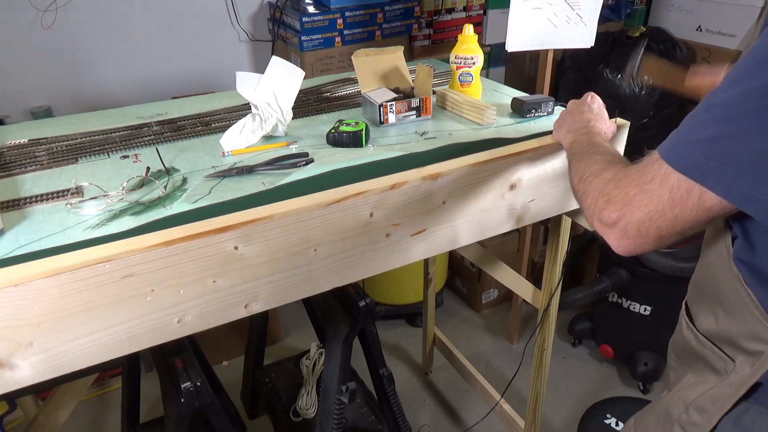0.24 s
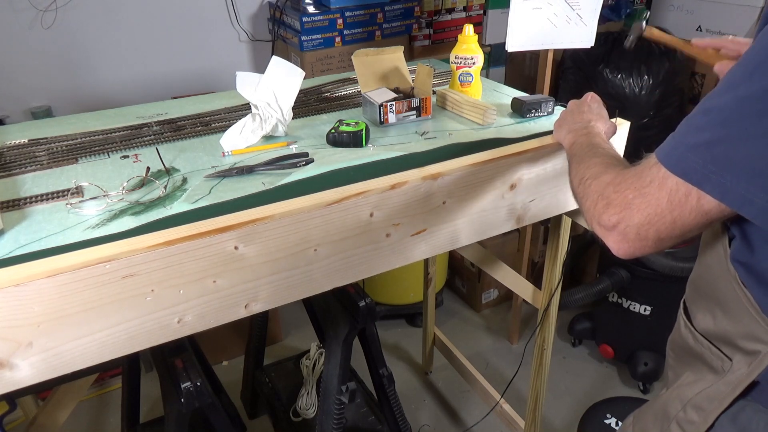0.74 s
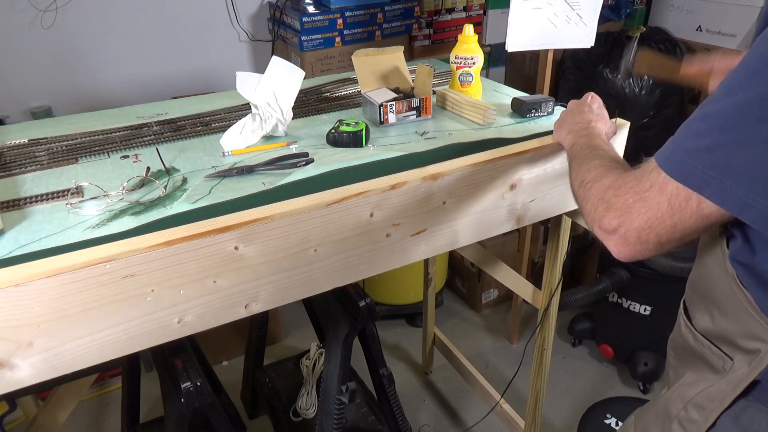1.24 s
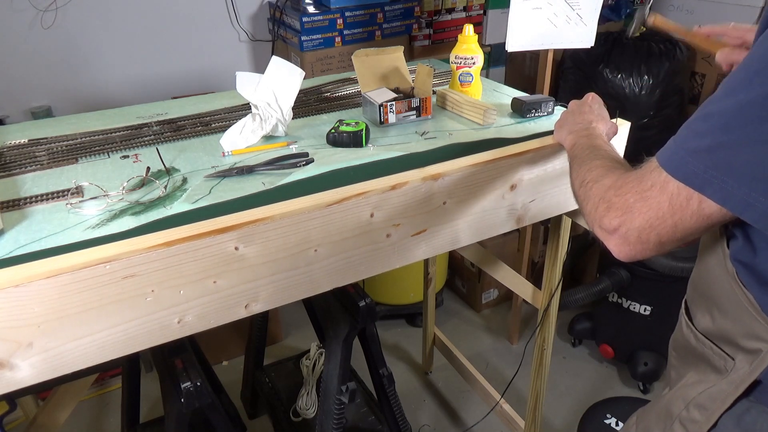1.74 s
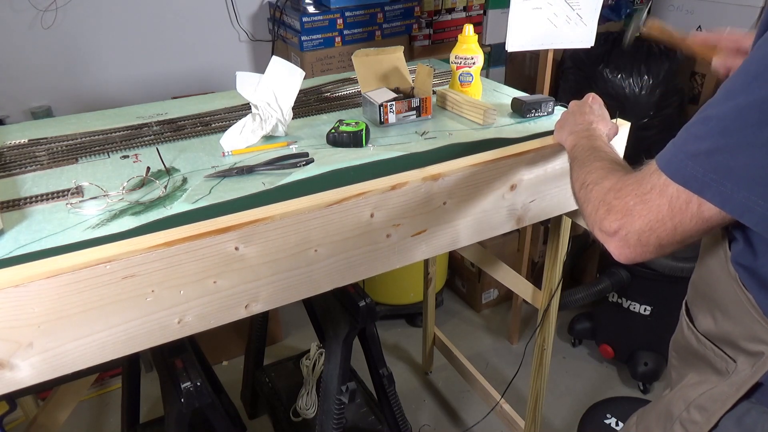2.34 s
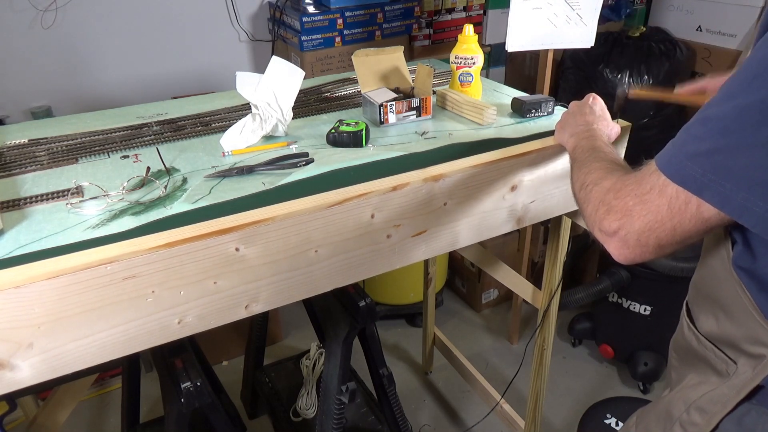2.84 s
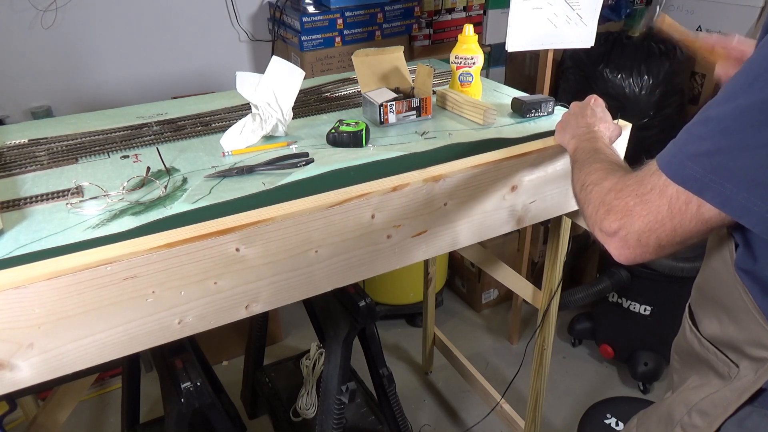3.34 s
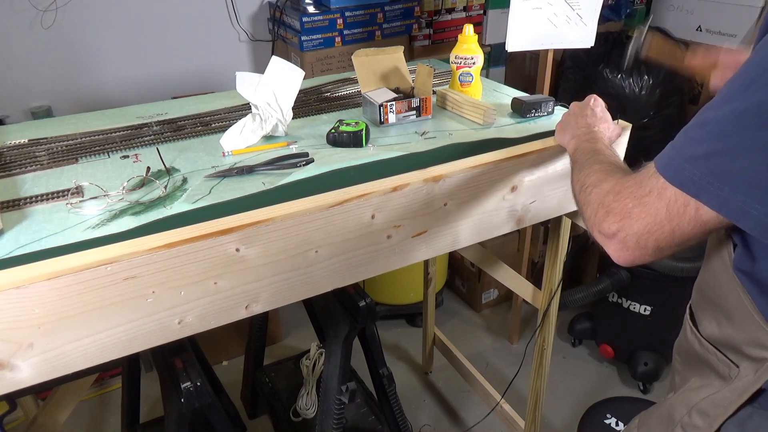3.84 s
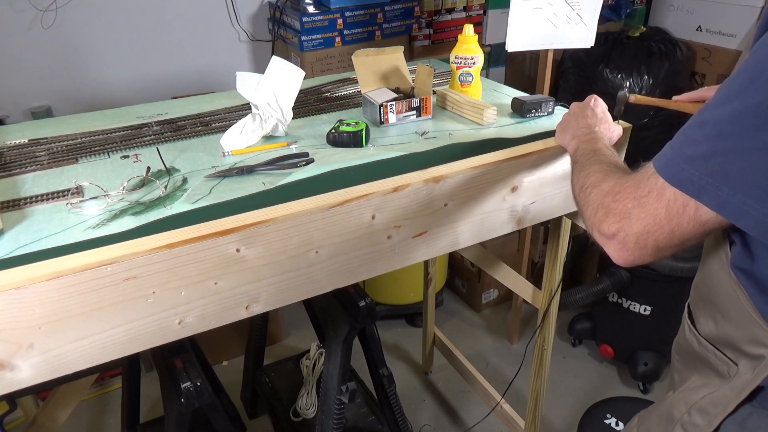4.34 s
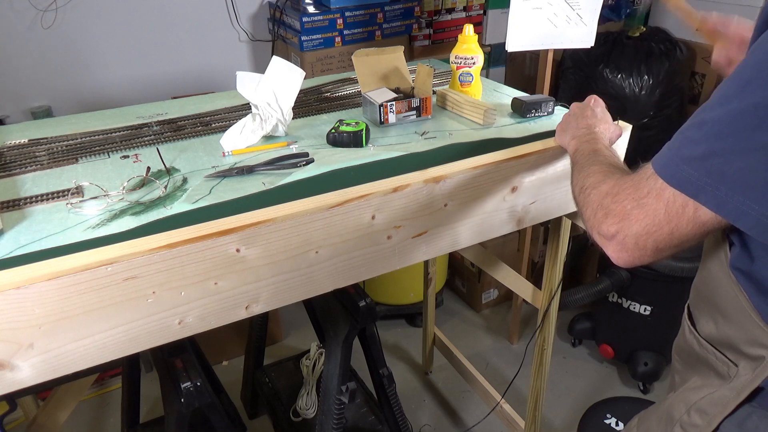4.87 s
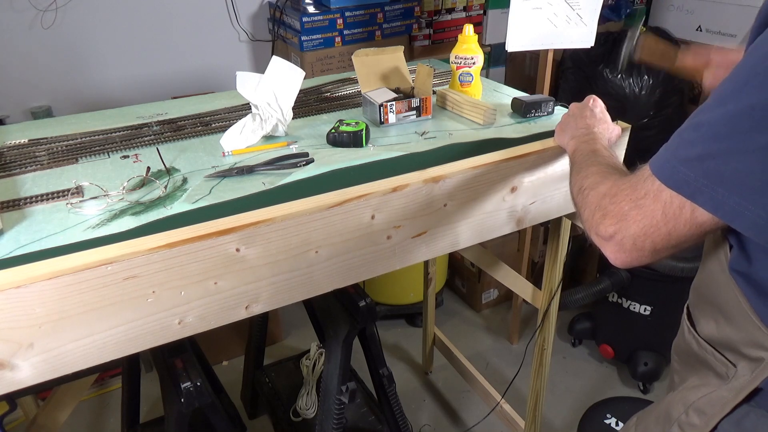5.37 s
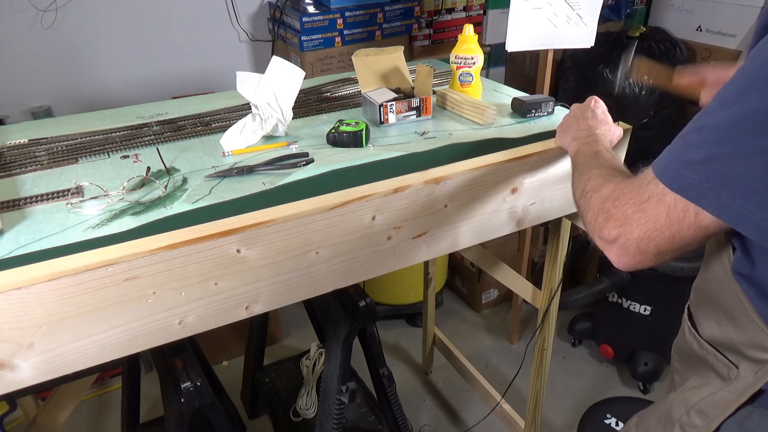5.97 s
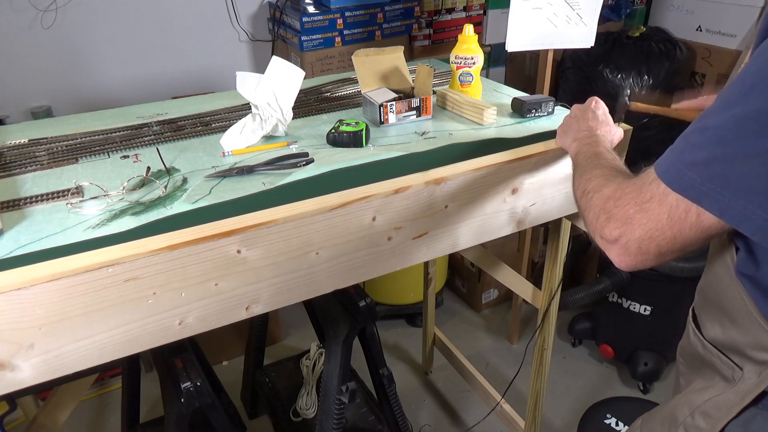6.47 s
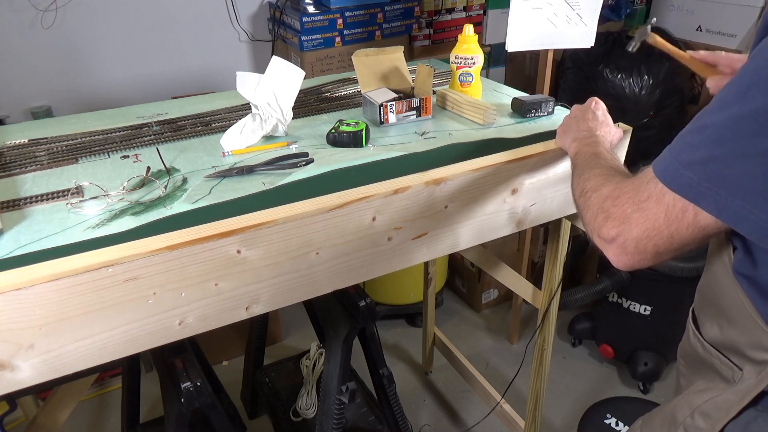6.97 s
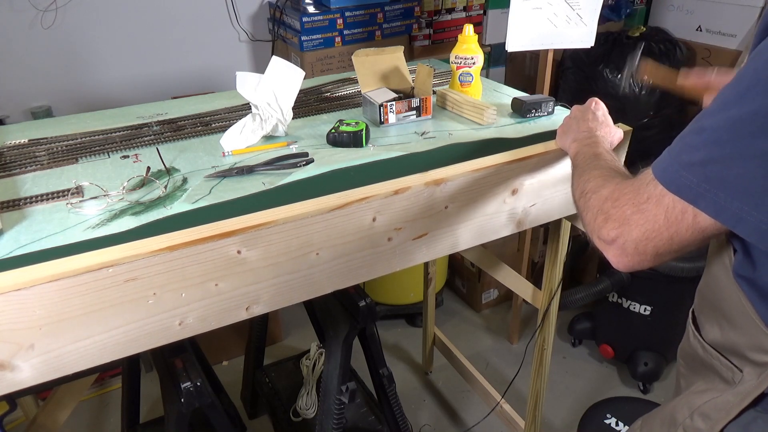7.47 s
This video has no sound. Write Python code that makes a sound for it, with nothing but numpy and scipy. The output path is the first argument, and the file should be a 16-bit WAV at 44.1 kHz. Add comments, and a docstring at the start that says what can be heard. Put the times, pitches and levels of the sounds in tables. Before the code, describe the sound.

A small hammer taps a brad through a wooden strip, about three sharp knocks a second, ringing briefly in a small workshop.

```python
"""A small hammer taps a brad through a wooden strip into a bench edge, mostly about three blows a second.
Each blow excites damped modes: a steel ping and a wooden knock, dull while the brad is loose, then harder
and higher in ring as it sinks. Three times the hammer glances off and lands on the wood. The small workshop
rings on as a dense noise tail, a limiter ducks the peaks, a few light ticks fall near the blows, and a
faint filtered-noise hiss and a hum of thin sines fade underneath."""
import sys
import numpy as np
from scipy import signal
from scipy.fft import next_fast_len
from scipy.io import wavfile
from scipy.ndimage import uniform_filter1d

SR = 44100
rng = np.random.default_rng(int(sys.argv[2]) if len(sys.argv) > 2 else 0)


def wrap_up_sound(samples):
    """Save the sound to the file named by the first command line argument, as 16-bit audio."""
    columns = np.atleast_2d(samples).T
    # keep every value between -1 and 1, then stretch to whole-number steps
    tamed = np.clip(columns, -1, 1)
    steps = np.round(tamed * 32767).astype(np.int16)
    wavfile.write(sys.argv[1], SR, steps)


N = 340008
RING_TIME = np.arange(SR // 2) / SR  # the half second in which a sound rings out


def gain_of(db):
    """Amplitude ratio: 20 dB is a factor of ten."""
    return 10 ** (np.asarray(db) / 20)


def read(points, hz):
    """Interpolation of a spectrum: straight lines over logarithmic frequency."""
    f, value = np.transpose(points)
    return np.interp(np.log(hz + 1), np.log(f), value)


def add(mix, s, sound):
    """Superposition: a sound is summed in at time s, which may lie before the start."""
    start = round(s * SR)
    sound = sound[max(-start, 0):]
    part = mix[max(start, 0):][:len(sound)]
    part += sound[:len(part)]


def colour(x, db_at):
    """Minimum-phase filtering: the Hilbert transform of the log gain gives the phase of a causal filter."""
    size = next_fast_len(len(x) + 4096)
    hz = abs(np.fft.fftfreq(size, 1 / SR))
    log_gain = np.log(gain_of(db_at(hz)))
    response = np.exp(np.conj(signal.hilbert(log_gain)))
    return np.fft.ifft(np.fft.fft(x, size) * response).real[:len(x)]


def late(x, s):
    """Propagation delay: the same sound s seconds later."""
    return np.interp(RING_TIME - s, RING_TIME, x, left=0)


def mode(hz, t60, rise, turn=0):
    """Damped resonance: a sine swells over rise seconds and loses 60 dB in t60 seconds."""
    t = RING_TIME
    swell = 1 - np.exp(-(t / rise) ** 2)
    return np.sin(2 * np.pi * (hz * t + turn)) * gain_of(-60 * t / t60) * swell


def depth_at(s):
    """Penetration: the depth of the brad at time s sets how it is held and which modes it excites."""
    # How far the brad is driven. Each row: time in seconds, depth from 0 (standing proud) to 1 (home).
    driven = [(0.9, 0.029), (2.9, 0.089), (4.12, 0.083), (4.42, 0.4), (6.27, 0.6), (6.87, 0.8)]
    return np.clip(np.interp(s, *np.transpose(driven)), 0, 1)


def looseness(depth, grip_depth=0.088):
    """Clamping: 1 for a brad that is barely set, 0 from the depth at which the wood grips it."""
    return np.clip(1 - depth / grip_depth, 0, 1)


def square_blow(s, force_db, thud_db=1.62, mid_db=-1, firm_db=3.0, loose_db=-15,
                steel_db=3, home_steel_db=3, slap_db=-6, give=1.0):
    """Yielding contact: a loose brad dulls the blow; the deeper it sits, the louder the steel pings."""
    depth = depth_at(s)
    loose = looseness(depth)
    hollow_db = mid_db + give * loose * force_db  # give in dB per dB of force
    hard_db = firm_db + loose_db * loose
    ping_db = steel_db + home_steel_db * depth
    return s, force_db, thud_db, hollow_db, hard_db, ping_db, slap_db


def contact_db(hz, thud_db, mid_db, hard_db, thud_hz=700, mid_hz=1050, mid_octaves=0.62, hard_hz=2000):
    """Contact spectrum: a square blow thuds, a glancing one sounds hollow, a short one bright."""
    thud = thud_db / (1 + (hz / thud_hz) ** 4)
    octaves_off = np.log2((hz + 1) / mid_hz)
    hollow = mid_db * np.exp(-.5 * (octaves_off / mid_octaves) ** 2)
    treble = hard_db * hz ** 2 / (hz ** 2 + hard_hz ** 2)
    return thud + hollow + treble


def cushion_db(hz, depth, loss_db=-5, from_hz=11500):
    """Compliance: a loose brad flexes and softens the very top of the blow."""
    # the loss is complete a fifth of an octave above from_hz
    return loss_db * looseness(depth) * np.clip(np.log2((hz + 1) / from_hz) * 5, 0, 1)


def ping(depth, echo_s=.00055, echo=0.72, rise=0.00035):
    """Impact of steel on steel: very short modes, doubled in phase by the bench top."""
    # Modes of hammer head and brad. Each row: frequency in Hz, relative level in dB with the brad
    # proud, relative level in dB nearly home, t60 in seconds.
    steel_modes = [(7760, -5.5, -8.5, 0.0021), (9278, -5.5, 2.5, 0.0053), (10296, 5, 4, .004),
                   (10637, -12.5, -1.5, 0.0064), (12560, -3, -1, 0.0024), (14904, 2.5, 4, 0.002)]
    out = 0
    for hz, proud, home, t60 in steel_modes:
        ring = mode(hz, t60, rise)
        whole_cycles_s = np.round(echo_s * hz) / hz
        doubled = ring + echo * late(ring, whole_cycles_s)
        out = out + gain_of(proud + depth * (home - proud)) * doubled
    return out


def crack(decay_s=0.0033):
    """Fracture noise: a burst a few thousandths of a second long as the fibres give."""
    # Dry crack of the wood at contact. Each row: frequency in Hz, relative level in dB per Hz.
    crack_spectrum = [(150, -20.5), (600, -1), (2000, -1), (3200, 0.5), (4600, -2.5), (5600, -6.5),
                      (7500, -4), (9000, -6.5), (12000, -13.5), (16000, -14.5)]
    burst = rng.standard_normal(len(RING_TIME)) * np.exp(-RING_TIME / decay_s)
    return colour(burst, lambda f: read(crack_spectrum, f))


def room_tail(build_s=0.00082, build_cycles=4):
    """Reverberation: each band of dense noise dies at its own speed, and the bass builds up slowest."""
    # Diffuse ring of the workshop. Each row: frequency in Hz, relative level in dB per Hz.
    room_spectrum = [(30, -44), (80, -8), (160, -8.5), (290, -4.5), (450, 1), (900, -7.5), (1250, -8),
                     (2150, -12), (2500, -11.5), (3100, -15), (4200, -17), (5500, -21), (8000, -24),
                     (9800, -18.5), (12000, -25), (15500, -30)]
    # Its decay. Each row: frequency in Hz, t60 in seconds.
    room_decay = [(80, 0.5), (200, 0.3), (450, 0.2), (1500, 0.25), (4000, 0.21), (9000, 0.2), (15000, 0.13)]
    hz, t, bands = signal.stft(rng.standard_normal(len(RING_TIME)), SR, nperseg=256)
    bands = bands * gain_of(-60 * t / read(room_decay, hz)[:, None])
    build = build_s + build_cycles / np.maximum(hz, 100)[:, None]
    bands = bands * (1 - np.exp(-t / build))
    tail = signal.istft(bands, SR, nperseg=256)[1][:len(RING_TIME)]
    return colour(tail, lambda f: read(room_spectrum, f))


def hammer(bench_db=0.0, bright_db=1, strip_db=1, crack_db=-1, room_db=-2.0, ping_db=-2, stray=0.54,
           swell_s=0.0083, swell_hz=450, swell_slope=1.5, scatter_db=2,
           clack_hz=2215, clack_t60=0.054, clack_db=-17):
    """Modal superposition: every blow excites strip, bench and room; the sinking brad shifts the weights."""
    # Lasting modes of bench and room. Each row: frequency in Hz, t60 in seconds, relative level in dB
    # with the brad standing proud, in dB half driven, in dB nearly home.
    bench_modes = [(125.7, 0.28, -29.5, -27, -35), (159.7, 0.34, -32, -32, -33.5),
                   (228.7, 0.3, -30.5, -26, -20.5), (248.1, 0.21, -24.5, -19, -13.5),
                   (328.3, 0.2, -26, -24, -34), (354.9, 0.17, -23.5, -18, -27.5),
                   (394, 0.17, -15.5, -13, -18), (442, 0.2, -21.5, -16, -23.5),
                   (468.7, 0.24, -16.5, -21.5, -17), (513.8, 0.17, -18, -25, -20),
                   (564, 0.16, -14.5, -26, -23.5), (612, 0.17, -24, -20.5, -47),
                   (658, 0.14, -21, -33.5, -29.5), (746, 0.14, -31.5, -42, -45), (736, 0.26, -34, -37, -19),
                   (812, 0.16, -17.5, -15.5, -26), (867.3, 0.099, -21, -8, -38.5),
                   (927, 0.2, -22.5, -29.5, -34), (943, 0.14, -20, -12.5, -18.5),
                   (968, 0.22, -30, -27, -31), (1092, 0.088, -35, -21, -27.5),
                   (1132, 0.15, -47, -12.5, -48), (1175, 0.2, -37, -26.5, -16.5),
                   (1397, 0.2, -34, -29, -16), (1442.6, 0.22, -26, -24.5, -9), (1461, 0.11, -17.5, -24, 4),
                   (1512, 0.2, -32, -29.5, -36.5), (1758, 0.13, -26, -20, -34),
                   (1875, 0.18, -29.5, -29, -20.5), (2210, 0.07, -32, -31.5, -52.5)]
    # Small bright modes of the boards on the bench. Each row: frequency in Hz, relative level in dB,
    # t60 in seconds.
    bright_modes = [(1860, -27, 0.19), (2310, -28, 0.2), (2413, -32.5, 0.13), (2866, -37, 0.1),
                    (4230, -41, 0.061), (3760, -38.5, 0.073), (7070, -45.5, 0.11)]
    # Fast modes of the strip under the hammer. Each row: frequency in Hz, relative level in dB with the
    # brad proud, relative level in dB nearly home, t60 in seconds.
    strip_modes = [(328, -8, -7.5, 0.031), (381.6, 0, 0.5, 0.023), (543, 1.5, 2, 0.028),
                   (700, -6.5, -18, 0.037), (895.6, -2.5, -6.5, 0.032), (1184, -22, -10, 0.0045),
                   (1538, -2, -2, 0.028), (1955, -9.5, -10.5, 0.019), (2227, -7.5, -8, 0.025),
                   (3080, -9.5, -13.5, 0.011), (4250, -12, -12, 0.03)]
    # Early reflections from walls and ceiling. Each row: delay in seconds, level in dB.
    wall_echoes = [(.0046, -13), (0.025, -26.5), (0.031, -20), (.0335, -25), (0.065, -31)]

    out = np.zeros(N)
    bench = []
    for hz, t60, *_ in bench_modes:
        # the heavy low modes take longest to swell, so each thump sinks in pitch
        rise = min(swell_s * (swell_hz / hz) ** swell_slope + 0.00066, .04)
        bench.append(mode(hz, t60, rise, rng.random()))
    bench = np.array(bench)
    bright = np.array([gain_of(db) * mode(hz, t60, .002, rng.random()) for hz, db, t60 in bright_modes])
    # neighbouring strip modes start with opposite signs
    strip = np.array([(-1) ** k * mode(hz, t60, 0.00032) for k, (hz, _, _, t60) in enumerate(strip_modes)])
    clack = gain_of(clack_db) * mode(clack_hz, clack_t60, 0.00012)
    tail_proud, tail_home, usual_crack = room_tail(), room_tail(), crack()

    for s, force_db, thud_db, mid_db, hard_db, steel_db, slap_db in contacts():
        depth = depth_at(s)
        # no two blows land on quite the same spot, so weights, crack and tail stray a little each time
        bench_level = [np.interp(depth, [0, .5, 1], row[2:]) for row in bench_modes]
        bench_weights = gain_of(bench_db + scatter_db * rng.standard_normal(len(bench)) + bench_level)
        bright_weights = gain_of(bright_db + scatter_db * rng.standard_normal(len(bright)))
        strip_weights = gain_of([strip_db + proud + depth * (home - proud)
                                 for _, proud, home, _ in strip_modes])
        # equal-power crossfade from one tail to the other as the brad sinks
        angle = depth * np.pi / 2
        tail = np.cos(angle) * tail_proud + np.sin(angle) * tail_home + stray * room_tail()
        fibres = gain_of(crack_db) * (usual_crack + stray * crack())
        knock = strip_weights @ strip + gain_of(slap_db) * clack + fibres
        echoes = sum(gain_of(db) * late(knock, delay) for delay, db in wall_echoes)
        wood = knock + echoes + bench_weights @ bench + bright_weights @ bright + gain_of(room_db) * tail
        wood = colour(wood, lambda f: contact_db(f, thud_db, mid_db, hard_db))
        blow = wood + gain_of(ping_db + steel_db + hard_db) * ping(depth)
        add(out, s, gain_of(force_db) * colour(blow, lambda f: cushion_db(f, depth)))
    return out


def fade(start_db, db_per_s):
    """Exponential decay: a level falling steadily in dB, as a gain for each sample."""
    return gain_of(start_db - db_per_s * np.arange(N) / SR)


def background(hiss_db=-51, hiss_fade_db_per_s=0.98, hum_db=-63, hum_fade_db_per_s=3.5):
    """Stationary noise and pure tones: low room noise and a thin hum, each under a slow fade."""
    # Spectrum of the room noise. Each row: frequency in Hz, relative level in dB per Hz.
    hiss_spectrum = [(15, -48.5), (25, -13.5), (87, 7), (217, 4.5), (293, -5.5), (439, -5), (714, -12.5),
                     (863, -11.5), (1290, -16), (2110, -22.5), (5430, -28), (9570, -29), (16000, -38.5)]
    # Thin steady tones. Each row: frequency in Hz, relative level in dB.
    hum_tones = [(866.7, 0), (1030, -7), (975, -13)]
    noise = colour(rng.standard_normal(N), lambda f: read(hiss_spectrum, f))
    hiss = noise / noise.std()
    t = np.arange(N) / SR
    # the root of two gives a 0 dB sine unit effective value
    hum = sum(gain_of(db) * np.sqrt(2) * np.sin(2 * np.pi * hz * t) for hz, db in hum_tones)
    return fade(hiss_db, hiss_fade_db_per_s) * hiss + fade(hum_db, hum_fade_db_per_s) * hum


def glancing_blow(s, force_db, hard_db, steel_db, thud_db=-9.0, mid_db=3, slap_db=13.5):
    """Short impulse: a bright contact with little weight that makes the strip clack."""
    return s, force_db, thud_db, mid_db, hard_db, steel_db, slap_db


def wood_blow(s, force_db, mid_db, thud_db=1.2, hard_db=-6, steel_db=-13, slap_db=-0.2):
    """Soft impact: the hammer face on bare wood sounds hollow, with hardly any ping."""
    return s, force_db, thud_db, mid_db, hard_db, steel_db, slap_db


def contacts():
    """Excitation: each contact is a time, a force and the balance of its spectrum."""
    # Square blows on the brad. Each row: start in seconds, force in dB.
    square_rows = [(-0.08, 3), (0.6397, -6.5), (0.9378, 0), (1.6559, -0.5), (1.9816, 0.1), (2.2766, 0.1),
                   (2.5765, 0.5), (2.8855, -0.5), (3.2054, -1.4), (3.5096, -2), (3.8137, -1.5),
                   (4.1183, -0.5), (4.4165, -0.5), (4.7311, -3), (5.0522, -5), (5.348, -5.5),
                   (5.6463, -4.5), (5.9575, -3.5), (6.5737, -3), (6.8673, -2.5), (7.1594, -3), (7.4468, -3)]
    # Blows that glance off the brad's head. Each row: start in seconds, force in dB, hardness as treble
    # in dB, steel ping in dB.
    glancing_rows = [(0.2423, 3.5, 0, 8), (1.2265, 0.5, 5.5, 4), (6.268, -27.5, 3.5, 14.5)]
    # The hammer then lands on the wood. Each row: start in seconds, force in dB, lift of the hollow mid
    # range in dB.
    wood_rows = [(0.2659, -5.5, 1), (1.243, -1.5, 2.5), (6.2713, -1, 9.5)]
    # Each result: start in seconds, then in dB: force, low thud, hollow mid range, hardness, steel ping,
    # clack of the strip.
    square = [square_blow(*row) for row in square_rows]
    glancing = [glancing_blow(*row) for row in glancing_rows]
    return square + glancing + [wood_blow(*row) for row in wood_rows]


def touches(snap_s=0.00061, snap_db=-8):
    """Impulse and resonance: tiny ticks of noise, each with the brief ring of one mode."""
    # Light touches and rattles. Each row: start in seconds, level in dB, pitch in Hz, t60 in seconds.
    tick_rows = [(3.786, -35, 1480, 0.012), (4.446, -14, 2190, 0.047), (5.675, -24, 4190, 0.071),
                 (6.244, -35.5, 1510, 0.0073), (6.404, -56, 9840, 0.07), (6.405, -46, 3760, .02)]
    out = np.zeros(N)
    for s, db, hz, t60 in tick_rows:
        snap = gain_of(snap_db) * rng.standard_normal(len(RING_TIME)) * np.exp(-RING_TIME / snap_s)
        add(out, s, gain_of(db) * (snap + mode(hz, t60, snap_s)))
    return out


def scene():
    """Superposition: all sources sum at one microphone."""
    return (hammer() + touches() + background())[None]


def record(dry, ceiling_db=-2.5, recovery_db_per_s=420, low_cut_hz=60, edge_hz=16100):
    """Peak limiting: gain ducks wherever a peak passes the ceiling and recovers fast; then band limiting."""
    over_db = np.maximum(20 * np.log10(abs(dry[0]) + 1e-9) - ceiling_db, 0)
    fall = np.arange(N) * recovery_db_per_s / SR
    # a running maximum on a falling slope holds each peak and lets it go at the recovery rate
    held_db = np.maximum.accumulate(over_db + fall) - fall
    duck_db = uniform_filter1d(held_db, size=15)
    limited = np.clip(dry * gain_of(-duck_db), -1, 1)
    low_cut = signal.butter(2, low_cut_hz, "highpass", fs=SR, output="sos")
    limited = signal.sosfilt(low_cut, limited)
    band_limit = signal.firwin(161, edge_hz, window=("kaiser", 9), fs=SR)
    return signal.oaconvolve(limited, band_limit[None], "same")


dry = scene()
out = record(dry)
wrap_up_sound(out)
```